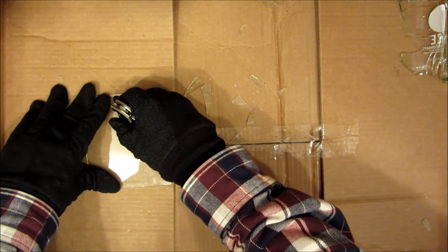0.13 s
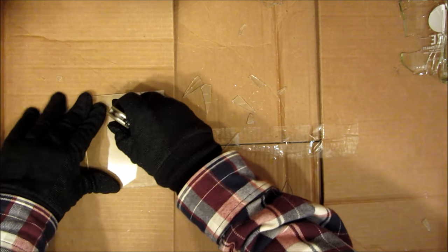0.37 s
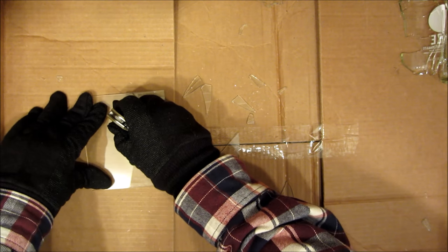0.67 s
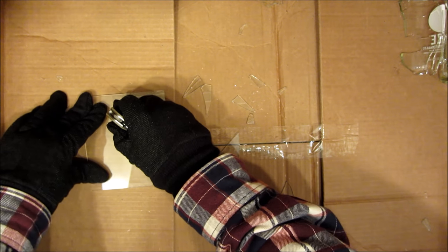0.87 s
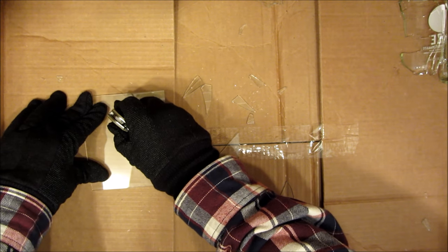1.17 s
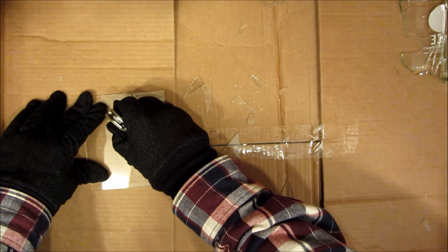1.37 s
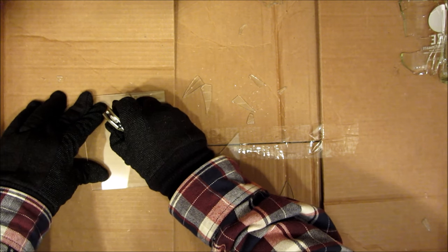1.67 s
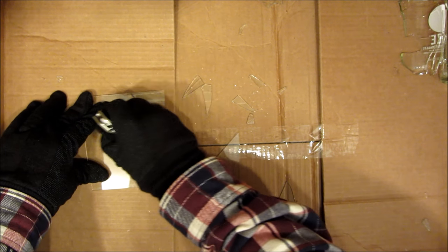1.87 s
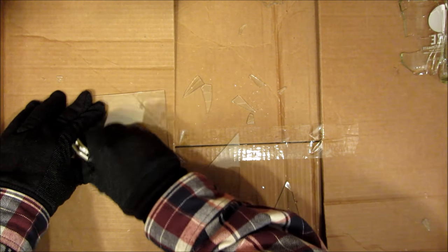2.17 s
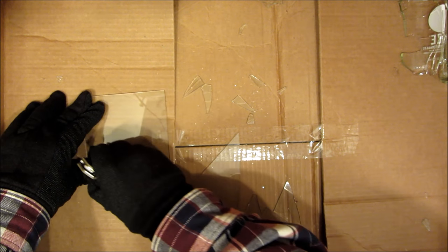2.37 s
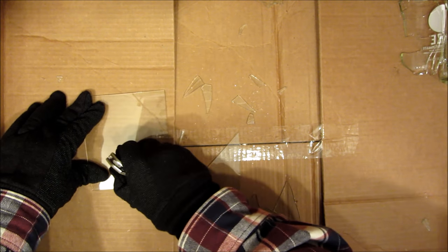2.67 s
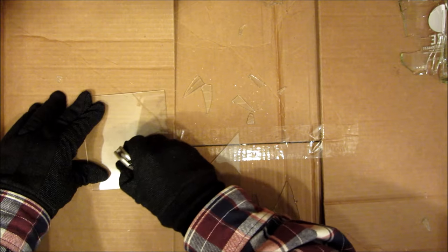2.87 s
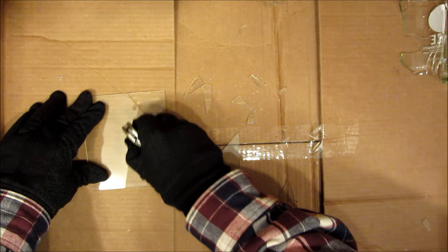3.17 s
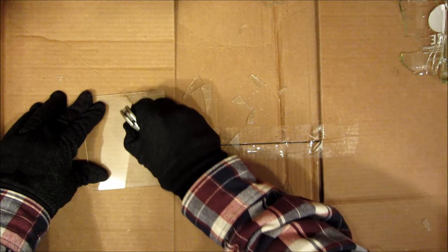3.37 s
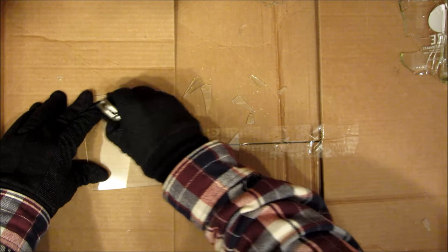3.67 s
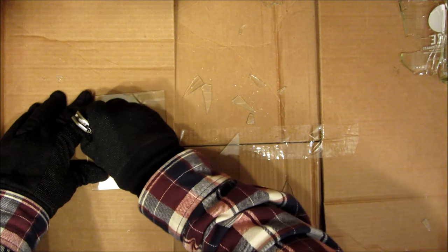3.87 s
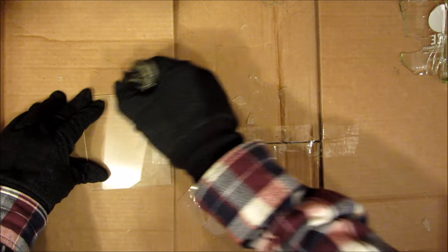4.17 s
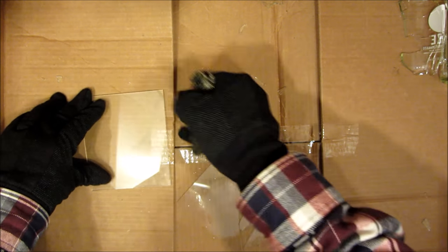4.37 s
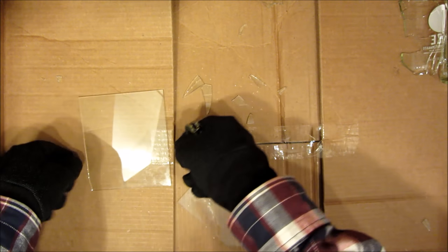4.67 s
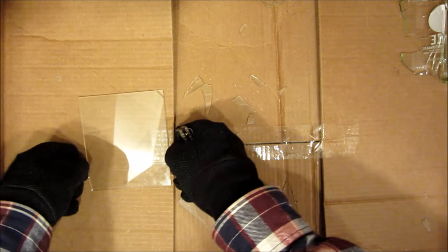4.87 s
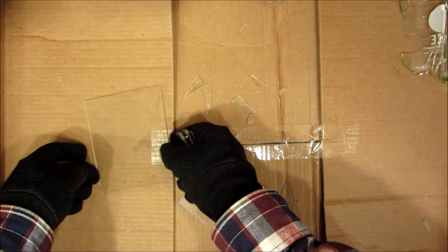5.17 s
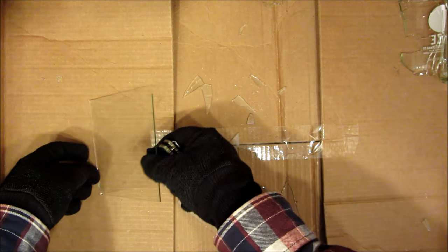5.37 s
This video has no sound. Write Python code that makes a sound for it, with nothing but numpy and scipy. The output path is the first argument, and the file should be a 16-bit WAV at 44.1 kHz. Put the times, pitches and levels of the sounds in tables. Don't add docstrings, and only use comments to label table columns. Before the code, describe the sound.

A small quiet room, miked closely in stereo, with low smooth ventilation hum and soft glove and sleeve rubbing throughout. At about 0.2 s a sharp papery rap is followed by a weaker one and tiny taps to 0.5 s; a faint skid with a thin squeak comes near 0.6 s. It is mostly quiet until a dull low thump and press at 1.85 s, with light touches after 2.1 s. From 2.5 to 2.7 s a hard tip bites glass in bright, gritty, ticking scratches over hollow thuds. Light ticks at 2.9 s lead to harsh drags at 3.0-3.2 s, then a dense rattle of glassy knocks and heavy shoves at 3.25-3.65 s. Soft skids and dull taps fade by 4.2 s. A hard click with a boxy cardboard thump hits at 4.44 s. A thud near 5.0 s, small ticks, short scrapes and a snappy tap with thin high squeaks around 5.4 s finish.

```python
import sys
import numpy as np
from scipy import signal
from scipy.fft import rfft, irfft
from scipy.io import wavfile
from scipy.ndimage import uniform_filter1d

SR = 44100
rng = np.random.default_rng(int(sys.argv[2]) if len(sys.argv) > 2 else 0)


def elevation(decibels):
    levels = np.asarray(decibels, float)
    return 10 ** (levels / 20)


def waveform_to_disk(signal):
    frames = np.transpose(np.atleast_2d(signal))
    scaled = np.clip(frames, -1, 1) * 32767
    samples = np.round(scaled).astype(np.int16)
    wavfile.write(sys.argv[1], SR, samples)


N = 243873


def work_piece():
    # hz, width_hz, level_db
    board_modes = [(80.7, 26, -9.5), (112.6, 24.8, 0), (139.5, 22, 1.5), (184, 17.8, -1),
                   (218.3, 22.6, -1.5), (268, 57, -20.5)]
    skin_modes = [(318, 60, -3), (472, 53, -2), (521.5, 45, 1), (667, 183, -2.5), (732, 72, 1),
                  (800, 55, 0), (964, 88, -1.5), (1176, 275, -7.5)]
    pane_modes = [(1230, 93, -20.5), (1400, 151, -3), (1540, 220, -4), (1710, 129, -1.5), (1954, 152, -0.5),
                  (2210, 523, -2), (2600, 463, -1), (3082, 560, -6)]
    grit_modes = [(4140, 2000, -5.5), (5230, 1050, 0.5), (5820, 700, 1), (6900, 800, -3.5), (7570, 490, -2),
                  (8600, 1380, -7), (9900, 790, -7.5), (10900, 700, -12), (14000, 2400, -12.5),
                  (15200, 1600, -15)]
    # unshared sound between the microphones, side_db
    side_db = [-22.5, -11, -6.5, -4.5]
    rough_db = [1.5, 2.5, 3.0, 3.5]
    stroke_wander_db = [1.2, 1.2, 1.2, 1.2]
    top_hz = [500, 1900, 3600, 16000]

    grain = elevation(-5.0) + elevation(-12.5) * crackle(160)
    clumps_db = 0.78 * drift(51) + 0.39 * drift(100) + chatter_db(0.52)
    nap_db = 1.2 * drift(10)
    out = 0
    for part, modes in enumerate((board_modes, skin_modes, pane_modes, grit_modes)):
        strokes = stroke_gain(part) * grain * friction(rough_db[part], clumps_db)
        knocks = knock_force(part) * rng.standard_normal((2, N))
        cloth = glove_gain(part) * elevation(-4.5) * friction(1.6, nap_db)
        ringing = resonate(strokes, modes, stroke_wander_db[part])
        ringing = ringing + resonate(cloth + knocks, modes, wander_db=0.75)
        top = signal.butter(2, min(top_hz[part], .45 * SR), fs=SR, output="sos")
        out = out + signal.sosfilt(top, ringing) * elevation(np.array([[0], [side_db[part]]]))
    return out


def stroke_gain(part):
    # start_s, length_s, weight_db, slide_db, peak_place (0-1)
    scores = [
        (2.545, 0.081, -28.5, -33.5, 0.67),
        (2.62, 0.11, -23.5, -29.5, 0.39),
        (1.84, 0.19, -25, -69, 0),
        (4.44, 0.12, -25, -53, 0.26),
    ]
    # start_s, length_s, weight_db, slide_db, peak_place (0-1)
    rubs = [
        (2.86, 0.15, -31.5, -48, 0.38),
        (3.014, 0.069, -19, -28, 0.2),
        (3.06, 0.14, -24, -60, 0.37),
        (3.27, 0.067, -23, -34, 0.62),
        (3.31, 0.04, -12.5, -46, 0.54),
        (3.365, 0.16, -15, -46, 0.1),
        (3.398, 0.043, -24, -36, 0.18),
        (3.365, 0.033, -35, -31, .1),
        (5.36, 0.07, -34.5, -34, 0.71),
    ]
    # start_s, length_s, weight_db, slide_db, peak_place (0-1)
    slides = [
        (.595, 0.16, -36.5, -63, 0.43),
        (2.13, 0.074, -43, -54, .75),
        (2.285, 0.055, -38.5, -42, 0.12),
        (3.115, 0.1, -25.5, -30, 0.48),
        (3.805, 0.072, -50, -51.5, 0.35),
        (3.515, 0.11, -21, -61, 0.33),
        (3.855, 0.064, -30, -52, 0.34),
        (5.03, .07, -28.5, -36.5, 0.65),
        (5.255, 0.078, -37.5, -35.5, 0.45),
        (5.48, 0.058, -45.5, -40, 0.72),
    ]
    score_db = [0.6, -10.5, 0, 0.5]
    rub_db = [-0.3, -4.5, -2, -1.5]
    slide_extra_db = [0.12, 4.1, 5.7, 0.11]
    rise_db = [7.8, 14, 17.6, 19]
    fall_db = [16.4, 23, 37, 27.6]

    power = np.zeros(N)
    for rows, extra_db in ((scores, score_db), (rubs, rub_db), (slides, slide_extra_db)):
        for start_s, length_s, weight_db, slide_db, place in rows:
            peak_db = drive_db(part, weight_db, slide_db, extra_db)
            power += swell(start_s, length_s, peak_db, place, rise_db[part], fall_db[part])
    return np.sqrt(uniform_filter1d(power, size=90).clip(0))


def knock_force(part):
    # start_s, weight_db, snap_db, t60_s
    raps = [(.196, -14.5, -19, .017), (.2865, -28, -32.5, 0.018), (1.844, -26, -59, 0.028),
            (2.188, -34, -47, 0.028), (2.288, -34, -33, 0.038), (2.575, -34, -29, 0.027),
            (2.586, -38, -30, 0.033), (3.298, -24, -33, .03), (3.4016, -49, -29.5, 0.051),
            (3.445, -40, -53, 0.019), (3.612, -46, -52, 0.015), (5.382, -52, -35, 0.041),
            (3.4858, -22, -43, 0.03), (3.5068, -13, -25.5, 0.02), (3.6305, -33, -42.5, .026),
            (3.7444, -26.5, -46, 0.054), (3.788, -41, -45, 0.022), (4.3196, -33, -28.5, 0.02),
            (5.4002, -33, -16.5, 0.023)]
    # start_s, weight_db, snap_db, t60_s
    taps = [(.2975, -37, -38, 0.075), (.398, -36, -61, 0.026), (.4542, -54, -35.5, 0.032),
            (.4974, -61, -41, .02), (.5058, -43, -25.5, 0.022), (1.8626, -21, -57, 0.038),
            (2.1377, -33.5, -45.5, 0.082), (2.5940, -38, -20, .014), (2.8641, -31.5, -43, 0.04),
            (2.9017, -38, -30, 0.034), (3.2512, -21.5, -17.5, 0.068), (3.3635, -26.5, -12.5, 0.026),
            (3.57, -13.5, -33, 0.021), (3.9567, -32.5, -46, 0.044), (4.0864, -24, -82, 0.031),
            (4.1835, -29.5, -77, 0.03), (4.4361, -16, -14.5, 0.043), (4.9906, -25, -45, 0.06),
            (5.2744, -36, -26, 0.024), (5.3657, -59, -36, 0.019)]
    # start_s, weight_db, snap_db, t60_s
    ticks = [(.799, -49, -39, .038), (1.5781, -43, -25.5, 0.044), (2.371, -44, -33.5, .03),
             (2.5458, -46, -27, 0.015), (2.5588, -22, -24, 0.018), (2.6235, -29, -14, 0.014),
             (2.9115, -41, -27, 0.031), (2.9256, -36, -25.5, 0.048), (2.9842, -35, -27, 0.037),
             (3.0195, -45, -21, 0.023), (3.069, -20, -25, 0.023), (4.4237, -24, -21, 0.025),
             (4.4524, -9, -15.5, .021), (5.1016, -30, -16, 0.03), (3.196, -45, -24, .015),
             (3.325, -50, -36, .015), (5.2648, -50, -38, .015), (5.197, -58, -33, .02),
             (.872, -60, -41, .025), (5.5187, -49, -40, 0.054)]
    rap_db = [.1, 8.3, 4.05, .1]
    tap_db = [2.1, 0.8, -4, 0]
    tick_db = [-3.5, -6, -6, -3]
    knock_db = [2, 0, 0, -5]
    stretch = [1.15, 0.92, 1.28, 0.96]

    envelope = np.zeros(N)
    for rows, extra_db in ((raps, rap_db), (taps, tap_db), (ticks, tick_db)):
        for start_s, weight_db, snap_db, t60_s in rows:
            length_s = np.clip(t60_s, .004, .2) * stretch[part]
            start = round(start_s * SR)
            after_s = np.arange(round(1.5 * length_s * SR)) / SR
            level_db = drive_db(part, weight_db, snap_db, extra_db) + knock_db[part]
            burst = elevation(level_db - 60 * after_s / length_s) * (1 - np.exp(-after_s / 0.00065))
            envelope[start:start + len(burst)] += burst[:N - start]
    return envelope


def glove_gain(part):
    # time_s, weight_db, slide_db
    handling = [(0.0, -38, -47.5), (.18, -47, -48.5), (.37, -34.5, -53.5), (.68, -57.5, -56.5),
                (.95, -41.5, -59.5), (1.2, -52, -71), (1.49, -51, -59), (1.7, -51, -68),
                (2.03, -32.5, -58.5), (2.45, -40.5, -59.5), (2.75, -47.5, -73), (3.1, -30.5, -50),
                (3.4, -23, -56), (3.9, -36.5, -58.5), (4.24, -40.5, -59), (4.5, -35.5, -43.5),
                (4.8, -41, -51.5), (5.53, -34.5, -51.5)]
    # start_s, length_s, weight_db, slide_db, peak_place (0-1)
    brushes = [(.0, 0.12, -51, -51, 0.7), (0.293, 0.12, -65, -47.5, 0.26), (0.904, 0.18, -42, -60.5, 0.87),
               (1.298, 0.37, -53, -55, 0.74), (1.854, 0.38, -43.5, -54, 0.5), (2.307, 0.37, -35, -49.5, 1),
               (0.7, 0.14, -50, -54, 0.54), (3.617, 0.2, -28.5, -74, 0.6), (3.95, .14, -56, -45.5, 0.46),
               (4.271, 0.17, -60, -42.5, 0.83), (4.575, 0.17, -48, -47.5, 0.93),
               (4.961, .08, -45, -53, 0.6)]
    glove_db = [-2.3, -4, 0.95, 0.3]
    brush_db = [-3, -4, 4.5, -0.1]

    time_s, weight_db, slide_db = np.transpose(handling)
    rub_db = np.interp(np.arange(N) / SR, time_s, drive_db(part, weight_db, slide_db, glove_db))
    power = elevation(rub_db) ** 2
    for start_s, length_s, weight_db, slide_db, place in brushes:
        peak_db = drive_db(part, weight_db, slide_db, brush_db)
        power = power + swell(start_s, length_s, peak_db, place, rise_db=8.5, fall_db=15)
    return np.sqrt(uniform_filter1d(power, size=400))


def drive_db(part, weight_db, sharp_db, extra_db):
    sharp_share = [.01, .35, .68, .99]
    return weight_db + sharp_share[part] * (sharp_db - weight_db) + extra_db[part]


def swell(start_s, length_s, peak_db, place, rise_db, fall_db):
    power = np.zeros(N)
    first = max(round(start_s * SR), 0)
    place = np.clip(place, .02, .98)
    u = np.linspace(0, 1, round(length_s * SR))[:N - first]
    away = np.where(u < place, (place - u) / place, (u - place) / (1 - place))
    depth_db = np.where(u < place, rise_db, fall_db) * away ** 2.32
    power[first:first + len(u)] = elevation(peak_db - depth_db) ** 2
    return power


def friction(rough_db, clump_db):
    sizes = elevation(rough_db * np.minimum(rng.exponential(1, N), 5) + clump_db)
    return rms_one(sizes * rng.standard_normal((2, N)))


def crackle(per_s):
    born = (rng.random(N) < per_s / SR) * elevation(3.5 * np.minimum(rng.exponential(1, N), 3))
    return rms_one(signal.lfilter([1], [1, -np.exp(-1 / (0.001 * SR))], born))


def chatter_db(depth_db):
    rate_hz = 153.2 * (1 + 0.125 * drift(26.0))
    return depth_db * np.cos(2 * np.pi * np.cumsum(rate_hz) / SR)


def resonate(force, modes, wander_db):
    click = np.eye(1, SR // 2)[0]
    out, ringing = 0, 0
    for k, (hz, width_hz, level_db) in enumerate(modes):
        r = np.exp(-np.pi * width_hz / SR)
        b = (-1) ** k * elevation(level_db) * (1 - r * r) / 2 * np.array([1, 0, -1])
        a = [1, -2 * r * np.cos(2 * np.pi * hz / SR), r * r]
        feed = rms_one(elevation(wander_db * drift(7.6)))
        out = out + signal.lfilter(b, a, feed * force)
        ringing = ringing + signal.lfilter(b, a, click)
    return out / np.sqrt(np.sum(ringing ** 2))


def drift(rate_hz):
    r = np.exp(-2 * np.pi * rate_hz / SR)
    noise = rng.standard_normal(N + SR)
    return rms_one(signal.lfilter([1], [1, -2 * r, r * r], noise)[SR:])


def rms_one(x):
    return x / np.sqrt(np.mean(x ** 2) + 1e-20)


def blows():
    # (hz, level_db, t60_s)
    spots = [
        ([(.1975, -15), (.287, -27.5)], [(131, -2, 0.044), (195.4, -0.5, 0.07), (464, -10, 0.087), (734, -6, 0.05), (878, -3.5, 0.045), (1267, 0.5, 0.023), (1665, -12, 0.07), (1950, 1.5, 0.02), (2600, -3, .025)]),
        ([(3.488, -37), (3.5085, -15), (3.570, -18.5), (3.630, -28.5), (3.750, -41)], [(568, -11.5, 0.16), (820, -1.5, 0.043), (950, -4, 0.049), (1167, 4.5, 0.014), (1540, 0.5, 0.034), (1760, 4.5, 0.01), (1880, -29, 0.038)]),
        ([(4.4405, -10.5), (4.4535, -25.5)], [(132, -9.5, 0.09), (228, 2, 0.048), (327, 0.5, 0.043), (402, -7, 0.066), (564, 1.5, 0.036), (800, -27, .04)]),
        ([(2.563, -17.5), (2.646, -17), (2.688, -18.5), (3.331, -13), (4.992, -20.5), (1.846, -21.5)], [(148, 0, 0.14), (121.5, -4.5, 0.14), (201, -8.5, 0.12)]),
    ]
    out = np.zeros(N)
    after_s = np.arange(SR // 4) / SR
    for hits, modes in spots:
        for start_s, hit_db in hits:
            start = round(start_s * SR)
            for k, (hz, level_db, t60_s) in enumerate(modes):
                strength_db = hit_db + level_db + rng.normal(0, 0.5)
                fade = (-1) ** k * elevation(strength_db - 60 * after_s / t60_s)
                out[start:start + len(after_s)] += fade * np.sin(2 * np.pi * hz * after_s)
    soft = signal.sosfilt(signal.butter(2, 3200, fs=SR, output="sos"), out)
    return soft * elevation(np.array([[0], [-17]]))


def steel_tip():
    # hz, width_hz, level_db
    tip_modes = [(3260, 1140, -9), (6073, 235, 5), (6220, 540, 3), (6750, 360, -7), (7800, 390, -12),
                 (8870, 150, -6), (10000, 340, -17.5)]
    # start_s, peak_db
    slips = [(2.5456, -16.5), (2.5587, -16.5), (2.5652, -25), (2.575, -21.5), (2.5874, -19.5),
             (2.5936, -22), (2.6228, -16), (2.6295, -23), (2.635, -22.5), (2.642, -25), (2.6491, -24),
             (2.6555, -29), (2.661, -28), (2.667, -29), (2.675, -31), (2.6825, -26), (2.696, -30),
             (2.902, -35.5), (2.9283, -38)]
    clicks, wakes = np.zeros(N), np.zeros(N)
    after_s = np.arange(SR // 50) / SR
    for start_s, peak_db in slips:
        start = round(start_s * SR)
        clicks[start] = elevation(peak_db + 22)
        wakes[start:start + len(after_s)] += elevation(peak_db + 5 - 60 * after_s / 0.012)
    chatter = bite_gain() * friction(4.4, chatter_db(3.0) + 1.8 * drift(60))
    force = chatter + wakes * rng.standard_normal((2, N)) + clicks * [[1], [0]]
    return resonate(force, tip_modes, wander_db=1.5) * elevation(np.array([[-4], [-11]]))


def bite_gain():
    # start_s, length_s, ring_db, peak_place (0-1)
    bites = [
        (2.462, 0.083, -43.5, 1),
        (2.56, 0.041, -34, 0.5),
        (2.618, 0.082, -24.5, 0.3),
        (2.888, 0.073, -50, 0.8),
        (3.006, 0.11, -38, .3),
        (3.116, 0.1, -26, 0.38),
    ]
    power = sum(swell(*row, rise_db=14, fall_db=36) for row in bites)
    return np.sqrt(uniform_filter1d(power, size=90).clip(0))


def pings():
    # start_s, peak_db, hz, t60_s
    touches = [(3.2628, -16, 1900, 0.022), (3.294, -18, 2020, 0.019), (3.3053, -21, 1950, 0.02),
               (3.333, -19.5, 1730, 0.02), (3.364, -20, 1930, 0.02), (3.3804, -25, 1920, 0.02),
               (3.4016, -22, 1750, 0.02), (3.4064, -19, 1700, 0.02), (3.4334, -25, 1720, 0.02),
               (3.4593, -31, 1870, 0.02), (3.4873, -18, 1700, 0.017), (3.518, -25, 1680, 0.02),
               (3.551, -20, 1440, 0.02), (3.5808, -20, 1740, 0.022), (3.59, -26, 1706, 0.02),
               (3.6099, -20.5, 1750, 0.02), (3.6289, -28, 1320, 0.02), (3.6533, -33, 1730, 0.02),
               (5.274, -26, 2630, 0.022), (5.4011, -20, 2400, 0.016), (5.5184, -30, 1920, 0.018)]
    out = np.zeros(N + SR)
    after_s = np.arange(SR // 10) / SR
    for start_s, peak_db, hz, t60_s in touches:
        start = round(start_s * SR)
        partner = elevation(-7) * np.sin(2 * np.pi * .55 * hz * after_s)
        pair = np.sin(2 * np.pi * hz * after_s) - partner
        fade = elevation(peak_db - 1 - 60 * after_s / np.clip(t60_s, .005, .06))
        out[start:start + len(after_s)] += fade * (1 - np.exp(-after_s / 0.00047)) * pair
    return out[:N] * elevation(np.array([[0], [-10]]))


def songs():
    # start_s, length_s, hz, width_hz, level_db
    singing = [(3.12, 0.08, 6030, 290, -31), (3.125, 0.055, 7200, 80, -36), (3.13, 0.085, 969, 53, -28.5),
               (3.13, 0.063, 1370, 66, -30), (3.135, 0.054, 2210, 90, -37), (3.135, 0.046, 2000, 90, -37),
               (2.62, 0.099, 2540, 300, -33.5), (2.64, 0.086, 1800, 250, -38),
               (5.265, 0.055, 3470, 216, -39), (5.265, 0.063, 6200, 100, -40.5), (5.27, .05, 3100, 80, -47),
               (5.375, .03, 3260, 200, -34), (5.385, .045, 4700, 120, -41), (5.39, .03, 5000, 150, -41),
               (5.05, 0.042, 2200, 180, -40), (5.055, .035, 5300, 200, -42), (.225, 0.036, 800, 150, -36.5),
               (.288, 0.029, 760, 200, -38), (.61, 0.066, 1210, 210, -47), (.675, .065, 1380, 162, -48.5),
               (.615, 0.05, 357, 60, -37.5), (0.73, 0.064, 2000, 150, -52), (3.4, 0.04, 1770, 250, -34),
               (3.525, 0.038, 1740, 260, -40), (3.81, 0.037, 2900, 400, -42.5),
               (3.855, 0.056, 2600, 350, -42.5), (3.865, .06, 1400, 120, -41),
               (3.742, 0.031, 1170, 150, -34.5), (3.41, 0.094, 380, 110, -33),
               (2.285, 0.024, 9500, 500, -48.5), (1.85, 0.057, 890, 150, -41), (2.1, 0.013, 2330, 150, -36),
               (3.6, .25, 74, 30, -38), (3.86, 0.053, 750, 250, -44), (1.843, .014, 1700, 140, -37),
               (1.85, .1, 213, 21, -35.5), (1.97, .08, 220, 27, -40), (3.25, 0.089, 345, 97, -30.5),
               (2.135, .07, 750, 75, -42.5), (2.285, 0.063, 745, 100, -41.5), (2.65, .07, 200, 36, -29.5)]
    out, grains = np.zeros((2, N)), friction(2.5, 0)
    for k, (start_s, length_s, hz, width_hz, level_db) in enumerate(singing):
        start, count = round(start_s * SR), round(length_s * SR)
        r = np.exp(-np.pi * max(width_hz, 15) / SR)
        force = grains[:, k * 5500:k * 5500 + count + 2000]
        a = [1, -2 * r * np.cos(2 * np.pi * hz / SR), r * r]
        tone = signal.lfilter([1, 0, -1], a, force)[:, -count:]
        out[:, start:start + count] += elevation(level_db) * rms_one(tone) * np.hanning(count) ** .5
    return out * elevation(np.array([[0], [-8]]))


def squeaks():
    # start_s, length_s, hz, level_db
    tones = [
        (.607, .05, 3060, -48),
        (.672, .018, 3030, -51),
        (.69, .03, 3120, -57),
        (.63, .05, 7900, -64),
        (3.86, .03, 7900, -58),
        (3.835, .07, 2680, -50),
        (5.365, .065, 7720, -42),
        (5.48, .05, 7750, -47),
    ]
    out, waver = np.zeros(N), drift(37)
    for start_s, length_s, hz, level_db in tones:
        span = slice(round(start_s * SR), min(round((start_s + length_s) * SR), N))
        phase = 2 * np.pi * hz * np.cumsum(1 + .003 * waver[span]) / SR
        level = elevation(level_db + 3 + 1.5 * waver[span])
        out[span] += level * np.sin(phase) * np.hanning(len(phase)) ** .5
    return out * elevation(np.array([[0], [-8]]))


def room(x):
    t60_s = 0.25
    t = np.arange(SR // 2) / SR
    tail = rng.standard_normal((2, len(t))) * elevation(-60 * t / t60_s) * (t > .006)
    tail = signal.sosfilt(signal.butter(1, [350, 5000], "band", fs=SR, output="sos"), tail)
    tail = tail / np.sqrt(np.sum(tail ** 2, axis=1, keepdims=True))
    return signal.fftconvolve(x[None], tail, axes=1)[:, :N]


def room_tone():
    # hz, level_db (per Hz)
    spectrum = [(15, -34), (25, -3.5), (114, -0.5), (301, -10.5), (354, -7), (451, -10), (887, -19),
                (1370, -19), (1480, -25), (2910, -28), (3920, -31), (7310, -34), (16000, -54)]
    # hz, level_db (rms)
    mains = [(120, -58.5), (360, -61)]
    hz = np.maximum(np.fft.rfftfreq(N, 1 / SR), 1)
    knot_hz, knot_db = np.transpose(spectrum)
    colour = elevation(np.interp(np.log(hz), np.log(knot_hz), knot_db))
    side = elevation(np.interp(np.log(hz), np.log([40, 150, 1000, 5000]), [-7, 5, 0.0, -0.5]))
    noise = irfft(rfft(rng.standard_normal((2, N))) * colour * [np.ones_like(hz), side], N)
    noise = elevation(-48.5) * noise / np.std(noise[0])
    t = np.arange(N) / SR
    hum = sum(elevation(level_db + 3) * np.sin(2 * np.pi * line_hz * t) for line_hz, level_db in mains)
    return noise + hum * [[1], [0]]


def scene():
    left_lead_s = 3.6e-5
    mid, side = work_piece() + blows() + steel_tip() + squeaks() + pings() + songs()
    left, right = mid + side, mid - side
    shift = np.exp(-2j * np.pi * np.fft.rfftfreq(N, 1 / SR) * left_lead_s)
    near = np.array([left, irfft(rfft(right) * shift, N)])
    tone_mid, tone_side = room_tone()
    return near + elevation(-14.5) * room(mid) + [tone_mid + tone_side, tone_mid - tone_side]


def low_pass(x):
    return signal.sosfilt(signal.butter(12, 16500, fs=SR, output="sos"), x)


def record(dry):
    no_bass = signal.sosfilt(signal.butter(2, 45, "high", fs=SR, output="sos"), dry)
    rounded = 0.88 * np.tanh(no_bass / 0.92)
    mix = signal.sosfilt(signal.cheby2(12, 45, 16800, fs=SR, output="sos"), rounded)
    return low_pass(mix)


dry = scene()
out = record(dry)
waveform_to_disk(out)
```